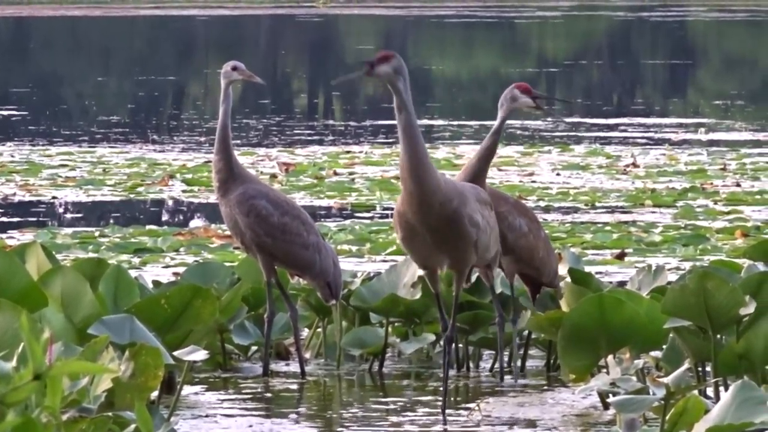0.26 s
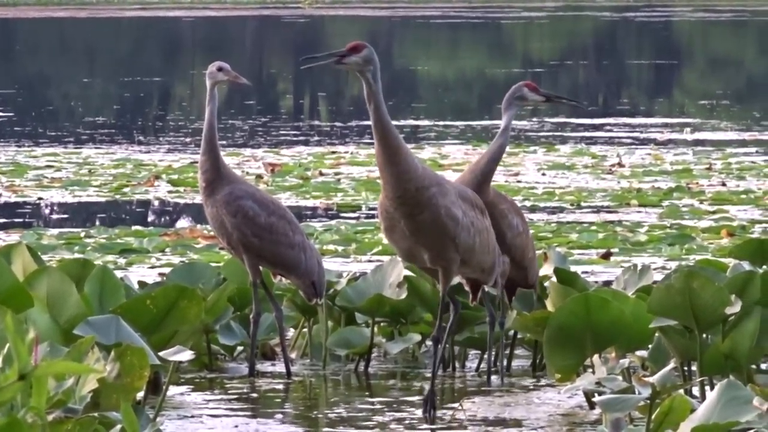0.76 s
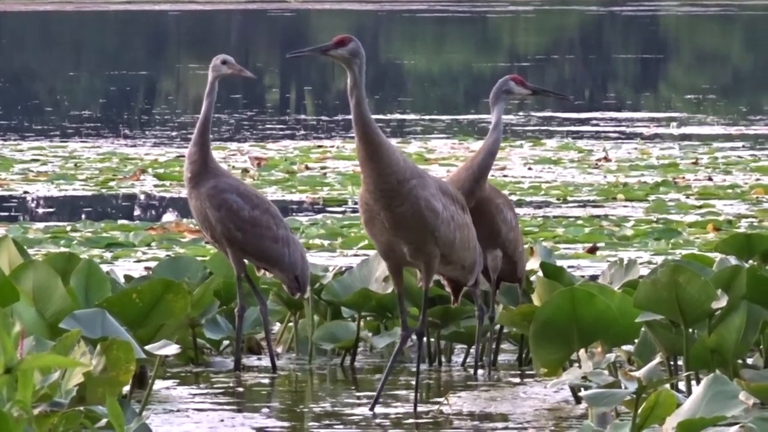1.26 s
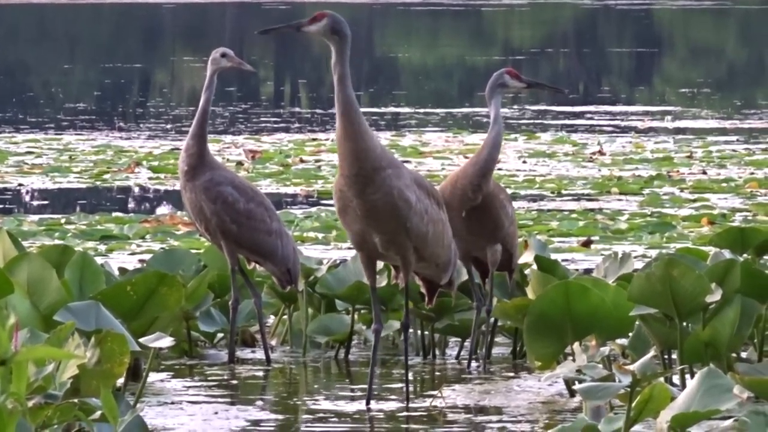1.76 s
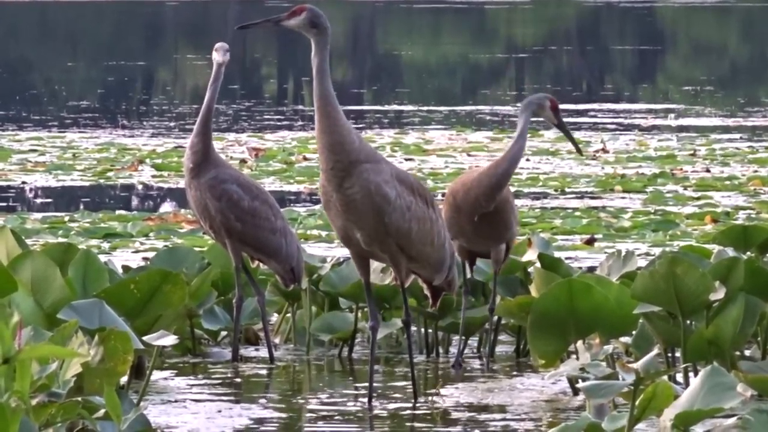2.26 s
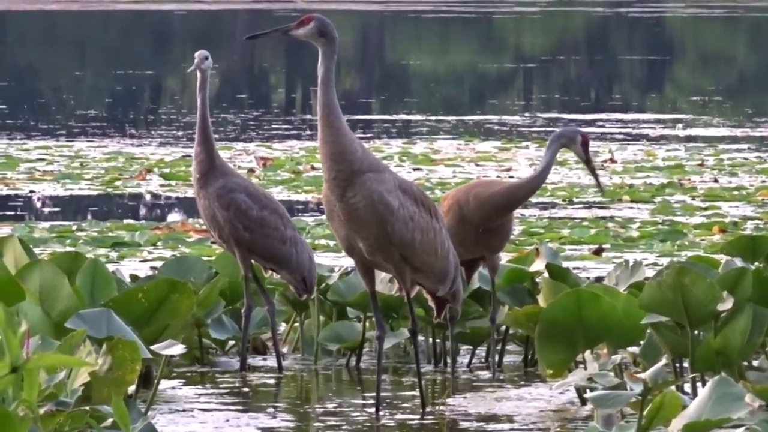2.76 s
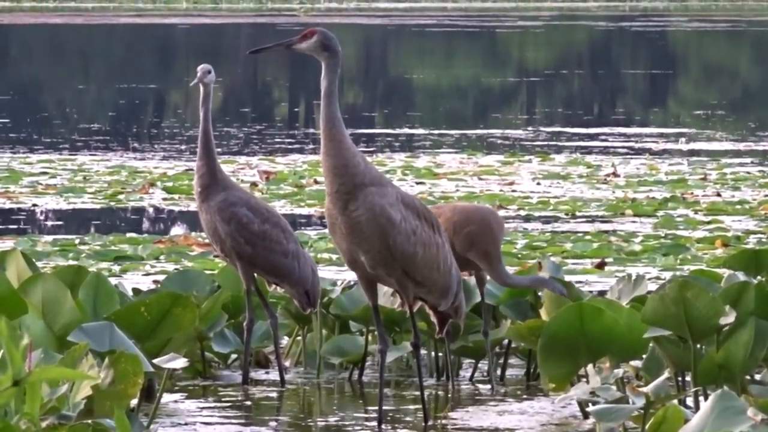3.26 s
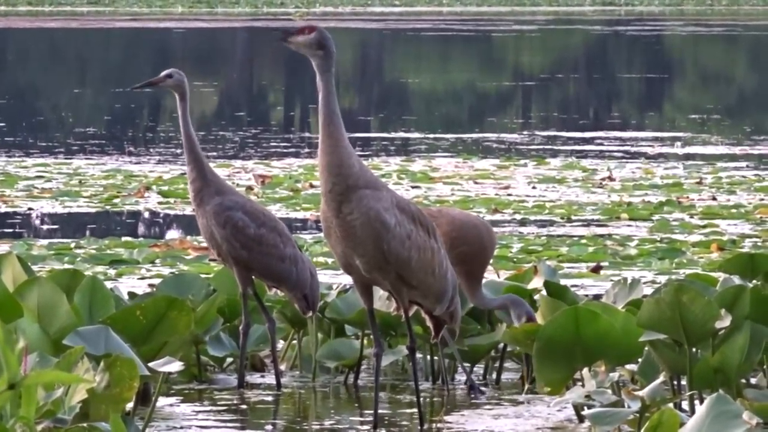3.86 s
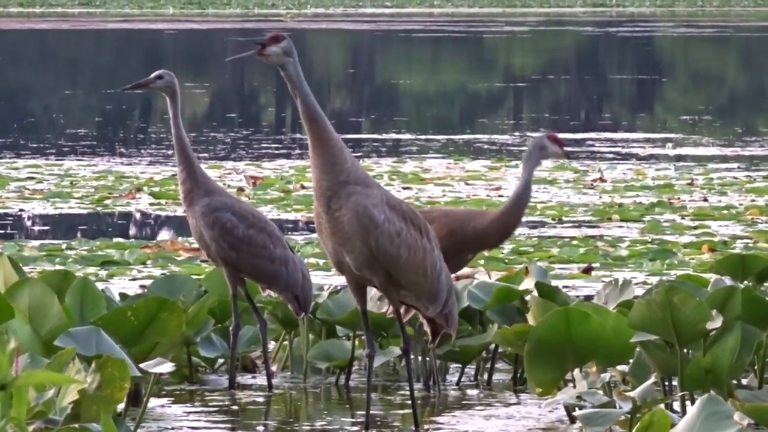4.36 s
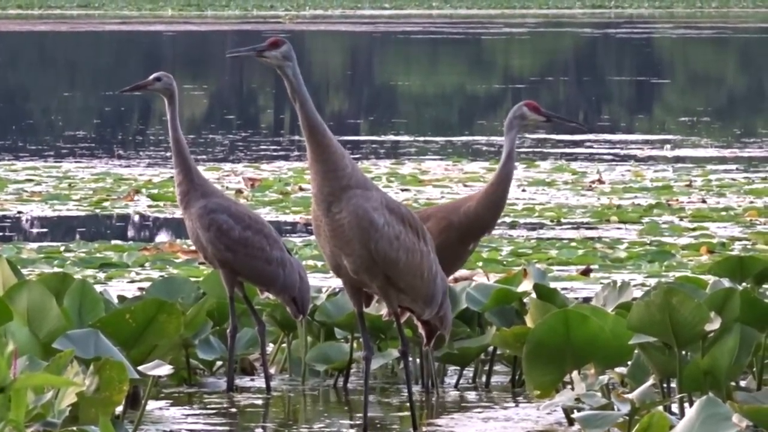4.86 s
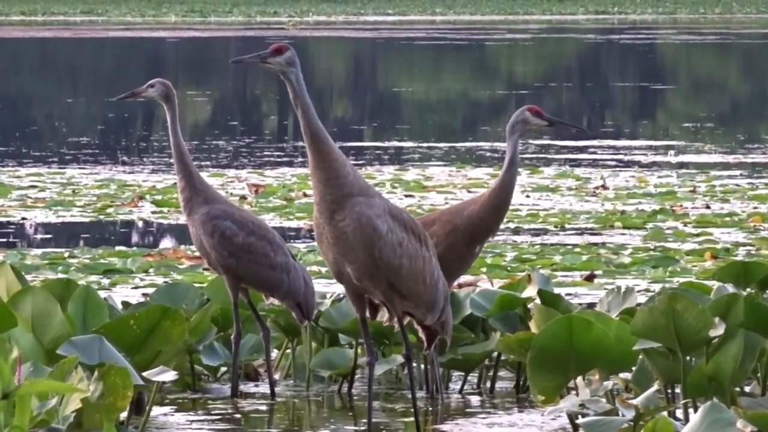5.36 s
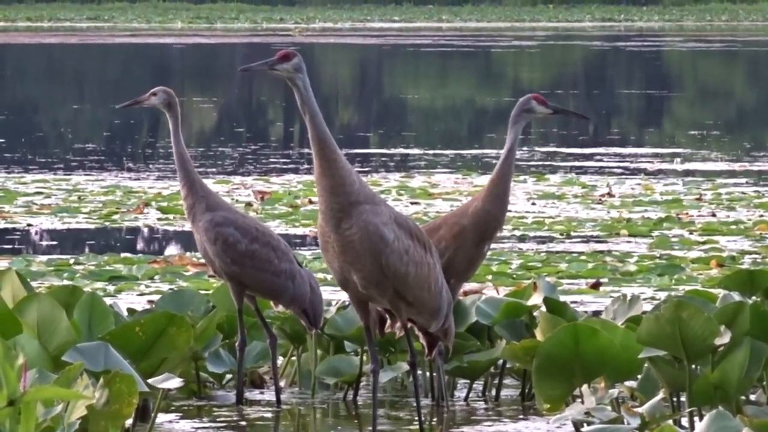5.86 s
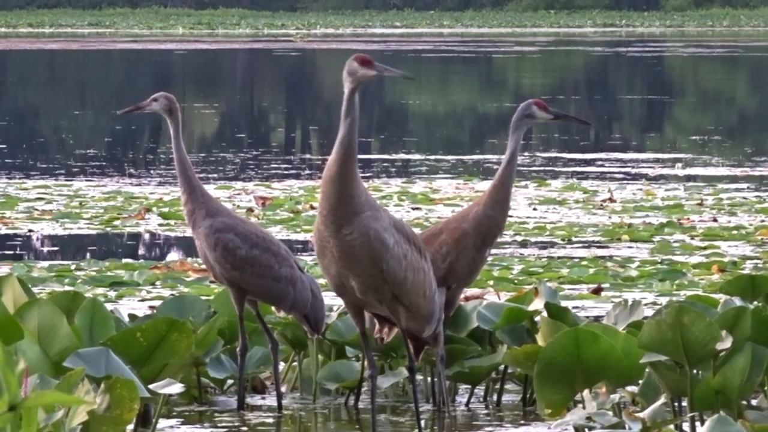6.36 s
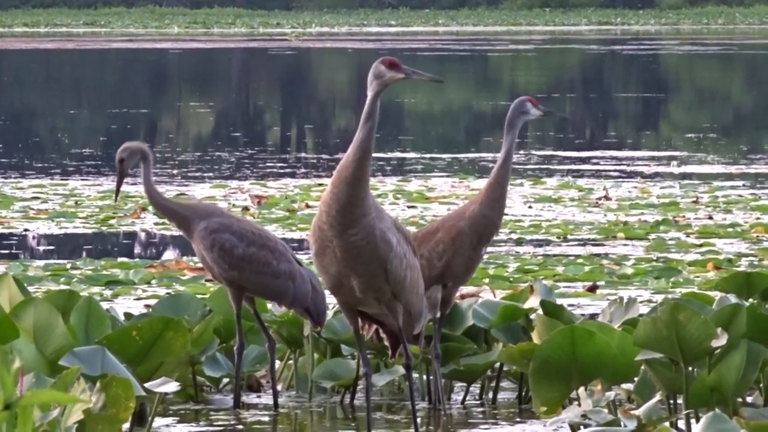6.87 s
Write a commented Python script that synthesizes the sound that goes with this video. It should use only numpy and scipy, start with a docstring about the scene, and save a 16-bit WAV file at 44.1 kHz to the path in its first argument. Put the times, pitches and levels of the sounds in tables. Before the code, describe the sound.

Across an open marsh, a large wading bird calls twice, each call a short, loud, throaty rattle of rapid clacks and toots with an echo trailing behind. The first comes at once, the second about halfway through. Between them a small bird chirps twice, barely audible. A soft wash of far wind and traffic lies underneath and swells slightly near the end. The calls sit near the centre, far louder than anything else.

```python
"""A sandhill crane standing among lily pads gives two rolling rattles across an open wetland.
Each is a string of very short notes (dry clacks, ringing toots, soft croaks) made by a source and a
filter: pulses of the syrinx excite the resonances of the long windpipe and radiate from the open bill.
Water, leaves and the wooded shore reflect the calls. Behind them lie a faint wash of distant wind
and traffic, a thin hiss and whine, and two chirps of a small bird."""
import sys
import numpy as np
from scipy import signal
from scipy.fft import rfft, irfft, next_fast_len
from scipy.io import wavfile

SR = 44100
rng = np.random.default_rng(int(sys.argv[2]) if len(sys.argv) > 2 else 0)


def output_pcm(signal):
    """Save a mono or channel-first signal as 16-bit PCM at the path in sys.argv[1].

    Samples are clipped to [-1, 1] before scaling.
    """
    pcm = np.clip(np.atleast_2d(signal).T, -1, 1) * 32767
    wavfile.write(sys.argv[1], SR, np.round(pcm).astype(np.int16))


N = 313674
TIME = np.arange(N) / SR


def from_db(db):
    """Amplitude grows tenfold for every 20 dB."""
    return 10 ** (np.asarray(db) / 20)


def rms_one(x):
    """Normalisation to unit mean power."""
    return x / np.sqrt(np.mean(x ** 2) + 1e-20)


def at_hz(points, hz):
    """Interpolation of a table on a log-frequency axis."""
    f, value = np.transpose(points)
    return np.interp(np.log(np.maximum(hz, 1)), np.log(f), value)


def bins(size):
    """Frequencies of a real Fourier transform."""
    return np.fft.rfftfreq(size, 1 / SR)


def coloured(x, spectrum, size=2048):
    """Minimum-phase filtering: folding the cepstrum gives a dB spectrum a causal response."""
    cepstrum = irfft(np.log(from_db(at_hz(spectrum, bins(size)))))
    cepstrum[1:size // 2] *= 2
    cepstrum[size // 2 + 1:] = 0
    return signal.oaconvolve(x, irfft(np.exp(rfft(cepstrum))))[:N]


def resonance(x, hz, width):
    """A damped resonator: two poles, unit gain at the peak."""
    r = np.exp(-np.pi * width / SR)
    feedback = [1, -2 * r * np.cos(2 * np.pi * hz / SR), r * r]
    return signal.lfilter(np.array([1, 0, -1]) * (1 - r * r) / 2, feedback, x)


def drift(seconds):
    """A random process of unit rms with about the given correlation time."""
    steps = rng.standard_normal(N // 20)
    return rms_one(np.interp(TIME / seconds, np.arange(len(steps)), steps))


def stereo_noise(spectrum, correlation, size):
    """Partial coherence: the ratio of shared to opposed noise sets the channels' correlation."""
    alike = np.clip(at_hz(correlation, bins(size)), -1, 1)
    mid, side = rfft(rng.standard_normal((2, size)))
    pair = np.sqrt((1 + alike) / 2) * mid + np.sqrt((1 - alike) / 2) * side * [[1], [-1]]
    return irfft(pair * from_db(at_hz(spectrum, bins(size))), size)


def panned(x, left_db):
    """A level difference between the channels gives direction."""
    return x * from_db(left_db * np.array([[.5], [-.5]]))


def leaning(pair, balance):
    """A level difference that depends on frequency."""
    size = next_fast_len(pair.shape[1])
    return irfft(panned(rfft(pair, size), at_hz(balance, bins(size))), size)[:, :pair.shape[1]]


# Spectral densities of the wash and the hiss (frequency [Hz], relative level [dB])
WASH_SPECTRUM = [(40, -42), (120, -37.5), (200, -25.5), (280, -17.5), (400, -24), (520, -18.5), (680, -5),
                 (950, -0.5), (1130, -2), (1330, -10.5), (1600, -10), (2200, -26), (4000, -37)]
HISS_SPECTRUM = [(1500, -18), (2000, -4), (3000, -2.5), (4100, -3), (4550, 0), (4950, -4.5), (8000, -8),
                 (11000, -12.5), (12800, -11), (16000, -18.5)]
# Envelope of the wash (time [s], relative level [dB])
WASH_ENVELOPE = [(0, -59), (2.2, -59.5), (3.3, -62), (4.9, -57), (5.9, -55.5), (6.5, -57.5), (7.1, -59)]
# Coherence of the ambient noise (frequency [Hz], left-right correlation [1])
AIR_CORRELATION = [(100, 0.4), (1000, 0.73), (2000, 0.25), (4000, 0.18), (8000, 0.17), (14000, 0.2)]
# Its balance (frequency [Hz], left minus right [dB])
AIR_PAN = [(1000, .5), (2000, 1.6), (4000, 3), (11000, 2.5), (14000, 6.5)]
def background(hiss_db=-67.5, whine_db=-83.5, whine_hz=13220):
    """Amplitude-modulated noise: far wind and traffic swell under a steady hiss and a faint whine."""
    size = next_fast_len(N)
    wash = rms_one(stereo_noise(WASH_SPECTRUM, AIR_CORRELATION, size)[:, :N])
    hiss = rms_one(stereo_noise(HISS_SPECTRUM, AIR_CORRELATION, size)[:, :N])
    wash_db = np.interp(TIME, *np.transpose(WASH_ENVELOPE)) + 1.4 + .55 * drift(.04)
    left, right = wash * from_db(wash_db) + from_db(hiss_db) * hiss
    air = np.array([np.roll(left, 3), right])   # arrives slightly earlier on the right
    whine = np.sqrt(2) * np.sin(2 * np.pi * np.cumsum(whine_hz + 35 * drift(.006)) / SR)
    return leaning(air, AIR_PAN) + panned(from_db(whine_db) * whine, left_db=15)


# Distant swells (peak time [s], level [dB], time spread [s], frequency [Hz], resonator width [Hz])
NOISE_SWELLS = [(5.415, -55.5, .27, 964, 169.7), (6.82, -56.5, 0.18, 1086, 200.5)]
def far_swells():
    """Narrow-band noise under Gaussian envelopes, off to the right: perhaps tyres on a road."""
    out = 0
    for s, db, spread, hz, width in NOISE_SWELLS:
        band = rms_one(resonance(resonance(rng.standard_normal(N), hz, width), hz, width))
        out = out + from_db(db) * band * np.exp(-.5 * ((TIME - s) / spread) ** 2)
    return panned(out, left_db=-3.5)


# Chirps (centre time [s], level [dB], start frequency [Hz], end frequency [Hz], duration [s])
BIRD_CHIRPS = [(1.887, -70, 3420, 2980, .045), (3.058, -65, 3230, 2800, 0.018)]
def small_bird():
    """Linear frequency sweeps: the faint falling whistles of a far bird."""
    out = np.zeros(N)
    for s, db, start_hz, end_hz, length in BIRD_CHIRPS:
        progress = np.clip((TIME - s) / length + .5, 0, 1)
        phase = 2 * np.pi * np.cumsum(start_hz + (end_hz - start_hz) * progress) / SR
        out += from_db(db) * np.sin(np.pi * progress) * np.sin(phase)
    return out


# Decay of the marsh (frequency [Hz], reverberation time [s])
REVERB_TIME = [(300, 0.5), (800, 1.2), (1500, 1.04), (3000, 1.02), (5500, 0.66), (8000, 0.7), (14000, 0.3)]
# Spectrum of its reverberation (frequency [Hz], level [dB])
REVERB_SPECTRUM = [(100, -11.5), (400, -9), (720, 2), (1050, -8.5), (1400, -3), (3000, -7), (6000, -6),
                   (14000, -3.5)]
# Coherence of all echoes (frequency [Hz], left-right correlation [1], clipped to 1 in use)
ECHO_CORRELATION = [(200, 1.1), (1000, 0.83), (2000, 0.93), (4000, 0.3), (8000, -0.1), (14000, 0)]
# Balance of the shore's echoes (frequency [Hz], left minus right [dB])
SHORE_PAN = [(300, 0.5), (900, -2), (2000, -2.4), (4000, 1.5), (7000, -1), (14000, 5.5)]
def shore_echoes(build_s=.022, far_db=-31, far_s=1.05, far_spread_s=.45, size=98304, bands=12):
    """Reverberation: reeds and trees lose the treble soonest; the far shore answers late and dull."""
    t, hz = np.arange(size) / SR, bins(size)
    spectrum = rfft(stereo_noise(REVERB_SPECTRUM, ECHO_CORRELATION, size))
    centres = np.geomspace(300, 15000, bands)
    tail = 0
    for centre, share in zip(centres, np.eye(bands)):
        band = irfft(spectrum * at_hz(np.c_[centres, share], hz))
        envelope = (1 - np.exp(-t / build_s)) * from_db(-60 * t / at_hz(REVERB_TIME, centre))
        tail = tail + band * envelope / np.linalg.norm(envelope)
    late = np.exp(-.5 * ((t - far_s) / far_spread_s) ** 2)
    far_spectrum = [(400, -2), (800, 1.5), (1100, -4.5), (1600, -5), (3000, -13), (8000, -55.5)]
    far = stereo_noise(far_spectrum, ECHO_CORRELATION, size)
    return leaning(tail + from_db(far_db) * far * late / np.linalg.norm(late), SHORE_PAN)


def scatter(spectrum, peak_s, size=4096):
    """Diffuse scattering: dense small reflections peak shortly after the direct sound."""
    t = np.arange(size) / SR
    envelope = (t / peak_s) ** 2 * np.exp(-2 * t / peak_s)
    return stereo_noise(spectrum, ECHO_CORRELATION, size) * envelope / np.linalg.norm(envelope)


# Reflection from the water (frequency [Hz], gain [dB])
WATER_REFLECTION = [(500, -7.5), (1600, -2.5), (3200, -3), (5000, -18), (9000, -16.5), (15000, -18)]
def over_water(voice, lag_s=.001863, sway=.025):
    """Comb filtering: the voice interferes with its mirror image, whose lag shifts as the head moves."""
    lag = lag_s * (1 + sway * drift(.054))
    return voice + coloured(np.interp(TIME - lag, TIME, voice), WATER_REFLECTION)


# Balance of the crane (frequency [Hz], left minus right [dB])
CRANE_PAN = [(500, 0.4), (2000, 1), (4000, 1.5), (8000, 2), (13000, 7)]
def at_microphones(x):
    """Level difference: the left microphone receives more of the crane's treble."""
    return np.array([coloured(x, [(hz, sign * db / 2) for hz, db in CRANE_PAN]) for sign in (1, -1)])


def note_envelope(t, length, start, fade):
    """Attack and decay: a note starts part-way up, peaks early and dies away past its length."""
    rise = start + (1 - start) * np.sin(np.pi / 2 * np.clip(t / (.35 * length), 0, 1))
    return rise * np.clip(1 + t / .0025, 0, 1) ** 2 / (1 + np.abs(t / length) ** fade)


def syrinx(notes, sag=.094, jitter=.056, shimmer_db=2.5, pulse_s=.000026, breath=.14, size=1400):
    """A pulse source: a few membrane slaps, falling in pitch, ride on the crests of their fundamental."""
    slaps, tones, rasps = np.zeros((3, N))
    lead = size // 10
    t = (np.arange(size) - lead) / SR
    cycle = np.arange(48) - 2
    for s, slap_db, tone_db, hz, length, sharp_db, rasp_db in notes:
        timing, strength = rng.standard_normal((2, len(cycle)))
        periods = (1 + sag * np.clip(cycle / (hz * length), 0, 2) + jitter * timing) / hz
        beats = np.cumsum(periods) - periods
        beats -= beats[2]   # cycle 0 falls on the onset
        force = note_envelope(beats, length, start=1, fade=7) * from_db(shimmer_db * strength)
        width = pulse_s * from_db(-sharp_db)
        pulses = force @ np.exp(-.5 * ((t - beats[:, None]) / width) ** 2)
        turbulence = breath * rng.standard_normal(size) * note_envelope(t, length, start=.38, fade=5)
        fundamental = np.cos(2 * np.pi * np.interp(t, beats, cycle))
        span = round(s * SR) - lead + np.arange(size)
        slaps[span] += from_db(slap_db) * (pulses + turbulence)
        rasps[span] += from_db(rasp_db) * (pulses + turbulence)
        tones[span] += from_db(tone_db) * fundamental * note_envelope(t, length, start=.53, fade=2.4)
    return slaps, tones, rasps


def within(table, start, end):
    """A time window: the rows within half a second of a rattle."""
    return [row for row in table if start - .5 < row[0] < end + .5]


# Soft low notes (time [s], source slap level [dB])
CROAK_NOTES = [(.2462, -31), (.2583, -22), (3.951, -33.5), (4.046, -36.5), (4.077, -27)]
def croaks(start, end, hz=570, length_s=.0085, tone_db=-41, sharp_db=-5.5, rasp_db=-9.5):
    """Low tension, low pitch: the slack membrane gives soft, dull pulses."""
    for s, db in within(CROAK_NOTES, start, end):
        yield s, db, tone_db, hz, length_s, sharp_db, db + rasp_db


# Higher ringing notes (time [s], source tone level [dB], duration [s])
TOOT_NOTES = [(.1483, -24, 0.0059), (.2149, -24, .009), (.2741, -23, 0.0071), (.3302, -29.5, 0.0046),
              (.3834, -25.5, .008), (.4325, -19.5, 0.0064), (4.1462, -18.5, 0.01), (4.2153, -12.5, 0.0075),
              (4.2755, -14, 0.0074), (4.332, -17.5, 0.0091), (4.3866, -18.5, 0.0066),
              (4.4363, -21.5, .0063), (4.484, -32.5, 0.0072)]
def toots(start, end, climax, top_hz, droop_rate, slap_db, rasp_db, sharp_db=1.8):
    """A strong fundamental sounds tonal; pitch and slap force arch over the rattle's climax."""
    for s, tone_db, length in within(TOOT_NOTES, start, end):
        droop = droop_rate * (s - climax) ** 2
        purer_db = 80 * max(climax - s, 0)   # toots start pure and grow raspy up to the climax
        yield s, slap_db - 30 * droop, tone_db, top_hz * (1 - droop), length, sharp_db, rasp_db - purer_db


# Hard dry notes that carry the roll (time [s], source slap level [dB], duration [s])
CLACK_NOTES = [(.0769, -21.5, 0.0058), (.3372, -8, 0.0065), (.3988, -10.5, 0.0097), (.4538, -9.5, 0.0081),
               (.5062, -5.5, 0.0042), (.5568, -8.5, 0.008), (.6061, -13.5, 0.011), (.6533, -12.5, 0.0048),
               (3.869, -47, .007), (3.942, -24, 0.0035), (4.010, -13.5, 0.0046), (4.068, -13, 0.0083),
               (4.1276, -10.5, 0.0041), (4.1587, -23.5, 0.0064), (4.1827, -10.5, 0.005),
               (4.2375, -7, .0037), (4.2867, -9, 0.006), (4.3408, -7.5, 0.0066), (4.3932, -4, 0.0054),
               (4.4444, -8.5, .0095), (4.4937, -4.5, .0035), (4.5422, -9, 0.0043)]
def clacks(start, end, held_hz=802.8, end_sag=.16, ordinary_db=-10):
    """Narrower pulses have wider spectra: harder clacks are sharper, with a stronger fundamental."""
    for s, db, length in within(CLACK_NOTES, start, end):
        progress = np.clip((s - start) / (end - start), 0, 1)
        force_db = db - ordinary_db
        spent = progress ** 4   # as the air runs out, rasp gives way to bare clicks
        hz = held_hz * (1 - end_sag * abs(2 * progress - 1) ** 6)   # sags at both ends of the rattle
        tone_db = -31 + .6 * force_db
        sharp_db = max(1 + .81 * force_db, -6) + 3.5 * spent
        rasp_db = db - 11.5 - 13.5 * spent
        yield s, db, tone_db, hz, length, sharp_db, rasp_db


# Windpipe resonances (frequency [Hz], bandwidth [Hz], gain [dB])
WINDPIPE_MODES = [(652, 42, 6), (877, 260, 5.5), (1670, 680, 1.5), (1960, 110, 5.5), (3164, 370, 7.5),
                  (3736, 170, 3), (4420, 310, 3)]
def windpipe(slaps):
    """Standing waves: the air column rings at its modes after each slap."""
    return slaps + sum((from_db(db) - 1) * resonance(slaps, hz, width) for hz, width, db in WINDPIPE_MODES)


def rattle(phrase, bill, rasp_hz, rasp_width_hz=1900, rasp_db=6, slap_db=1.5):
    """Source and filter: windpipe and open bill colour the slaps; forced notes add a high reedy rasp."""
    start, end = phrase[:2]
    slaps, tones, rasps = syrinx([*clacks(start, end), *toots(*phrase), *croaks(start, end)])
    slap_floor, rasp_floor = 1e-12 * rng.standard_normal((2, N))   # inaudible; prevents filter underflow
    ringing = windpipe(coloured(slaps, bill) + slap_floor)
    reed = resonance(resonance(rasps + rasp_floor, rasp_hz, rasp_width_hz), rasp_hz, rasp_width_hz)
    return from_db(slap_db) * ringing + tones + from_db(rasp_db) * reed


# Response of the open bill in each rattle (frequency [Hz], gain [dB])
FIRST_BILL_RESPONSE = [(40, -47.5), (130, -31), (390, -31.5), (520, -8.5), (700, -3), (1200, 3.5),
                       (2400, -6.5), (3300, -0.5), (5300, 2.5), (7400, 3.5), (8200, 0.5), (10500, -4),
                       (13000, -2.5), (16000, -11)]
SECOND_BILL_RESPONSE = [(40, -43), (130, -31), (390, -24), (520, -7), (700, -0.5), (1200, 3.5),
                        (2400, -2.5), (3300, 1), (6300, 5), (8000, -4.5), (8600, 1), (10000, -4.5),
                        (13000, -3), (16000, -14)]
# The rattles (start [s], end [s], climax [s], top toot pitch [Hz], toot pitch droop [1/s^2],
# toot slap level [dB], toot rasp level [dB])
PHRASES = [(0.079, 0.648, .265, 1019, 2.0, -11, -18), (3.924, 4.544, 4.28, 1067, 3.7, -15.5, -14)]
def crane():
    """Filtering sets timbre: each of the two rattles has its own bill response and rasp band."""
    first = rattle(PHRASES[0], FIRST_BILL_RESPONSE, rasp_hz=4600)
    second = rattle(PHRASES[1], SECOND_BILL_RESPONSE, rasp_hz=4844)
    return first + second


def scene():
    """Superposition: the crane's calls, their reflections and the quiet of the marsh add up."""
    voice = crane()
    direct = at_microphones(over_water(voice))
    ripples = scatter([(300, -18), (1000, -17), (2500, -7.5), (5000, -9), (14000, -10)], peak_s=.0015)
    leaf_spectrum = [(300, -13), (700, -10.5), (1100, .5), (2000, -2), (5000, -9.5), (14000, -5.5)]
    lily_pads = scatter(leaf_spectrum, peak_s=.0087)
    paths = [(direct, ripples), (voice[None], lily_pads), (voice[None], shore_echoes())]
    echoes = sum(signal.fftconvolve(sound, response, axes=1)[:, :N] for sound, response in paths)
    return direct + echoes + background() + far_swells() + small_bird()


def record(dry):
    """Band limiting: an elliptic low-pass cuts steeply above 16.1 kHz."""
    return signal.sosfilt(signal.ellip(10, .1, 80, 16100, fs=SR, output="sos"), dry)


dry = scene()
out = record(dry)
output_pcm(out)
```